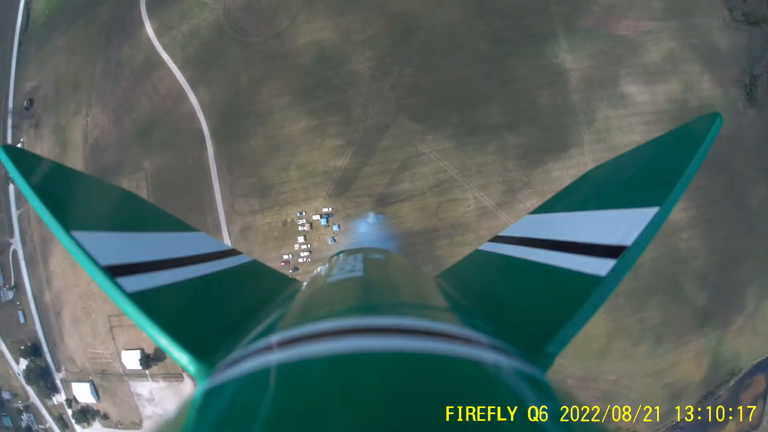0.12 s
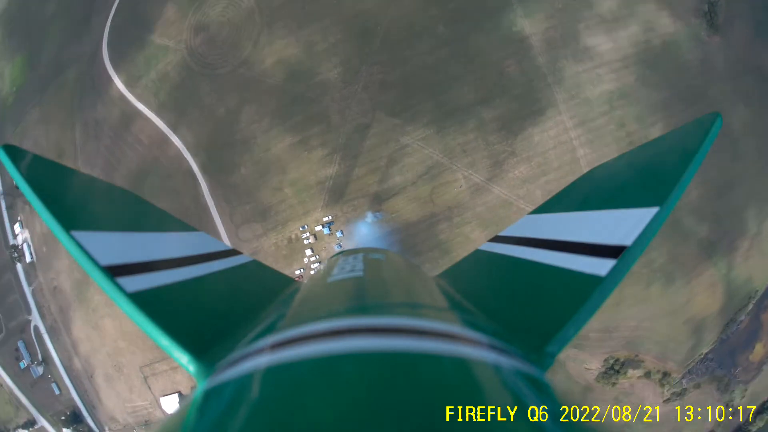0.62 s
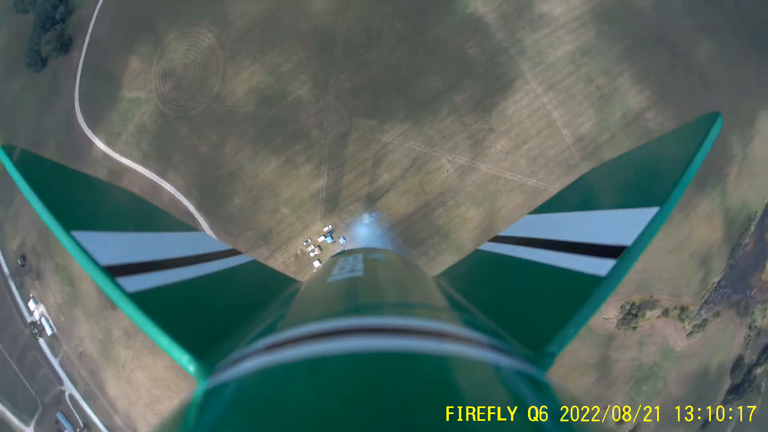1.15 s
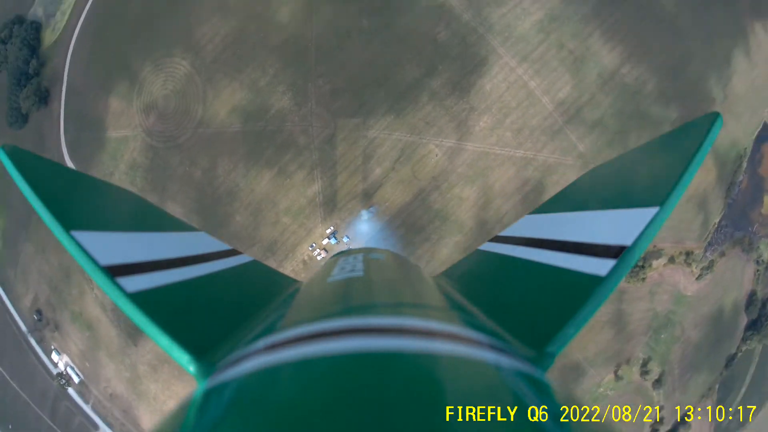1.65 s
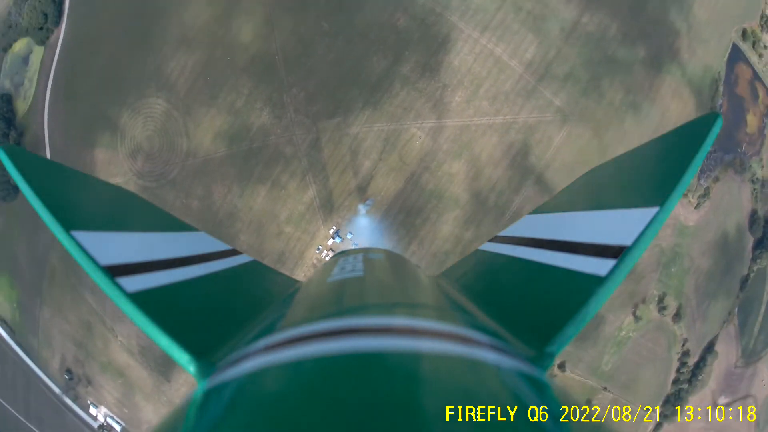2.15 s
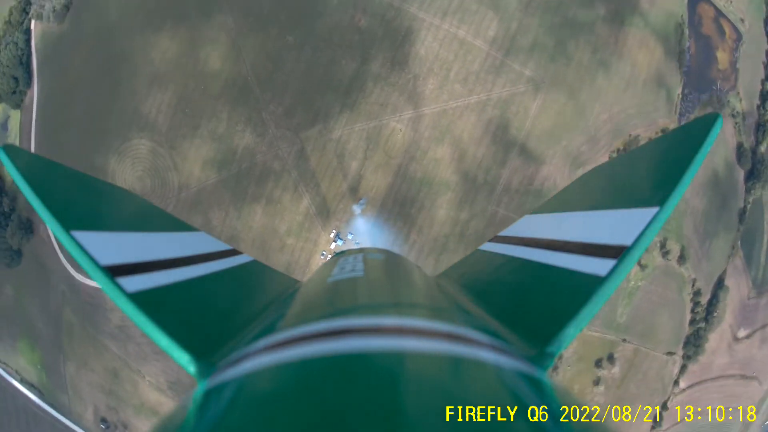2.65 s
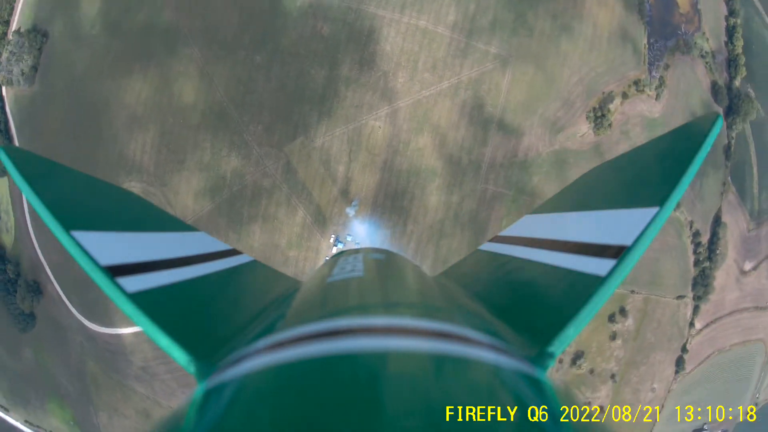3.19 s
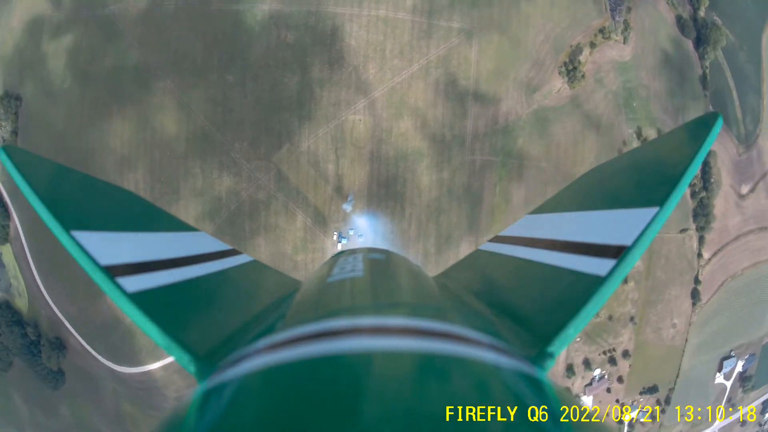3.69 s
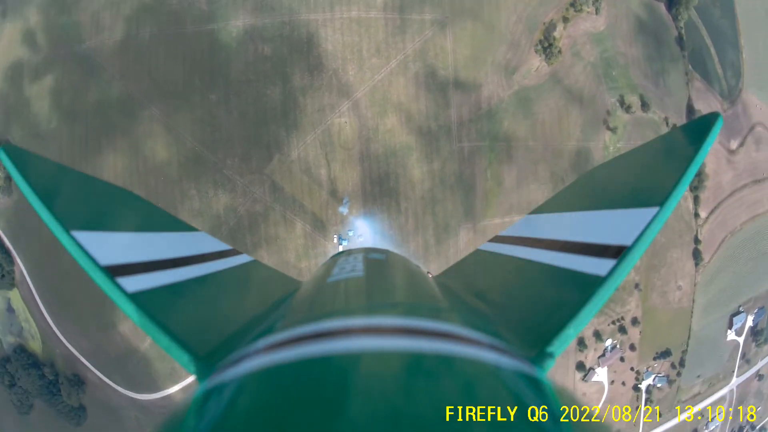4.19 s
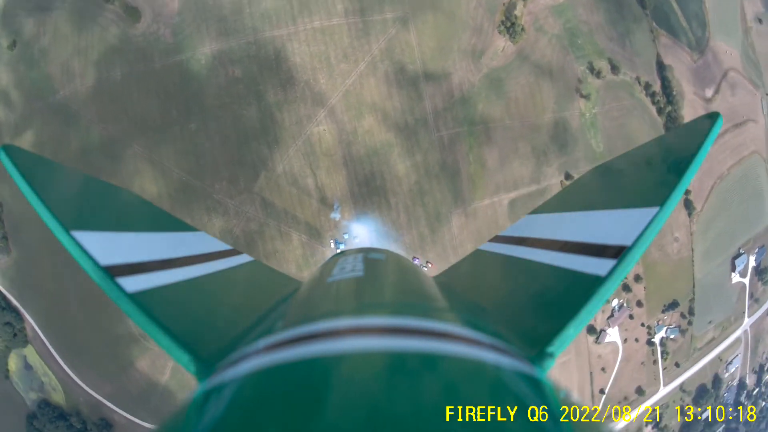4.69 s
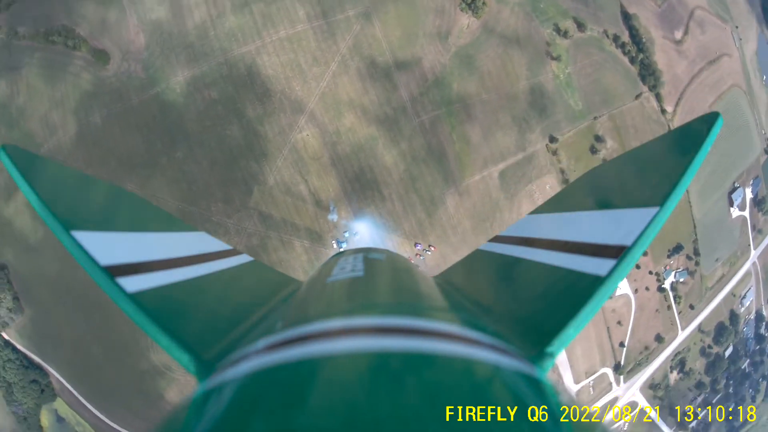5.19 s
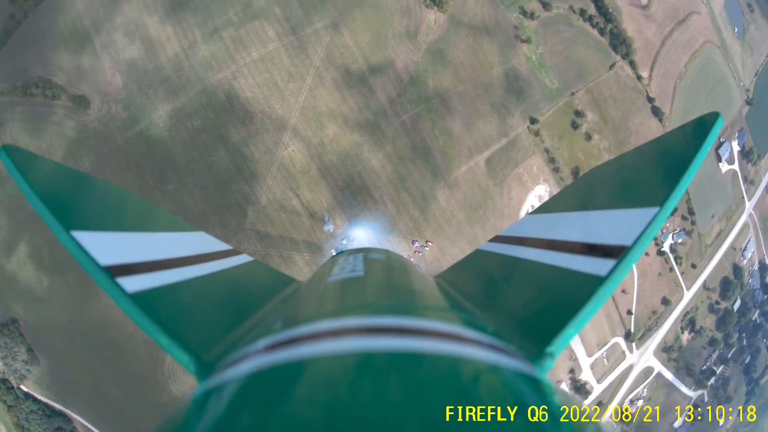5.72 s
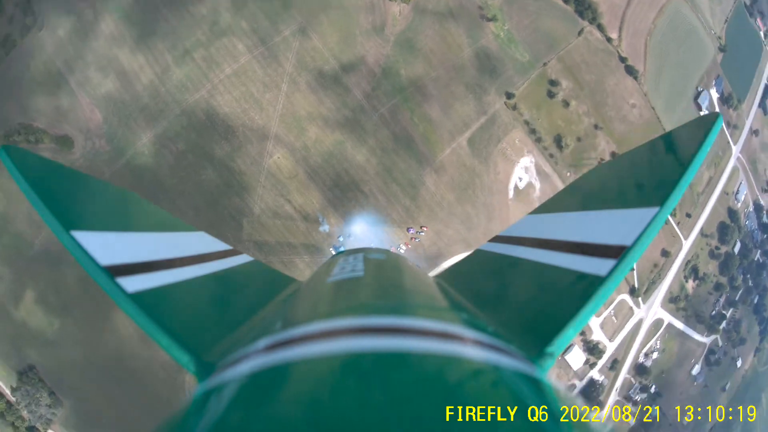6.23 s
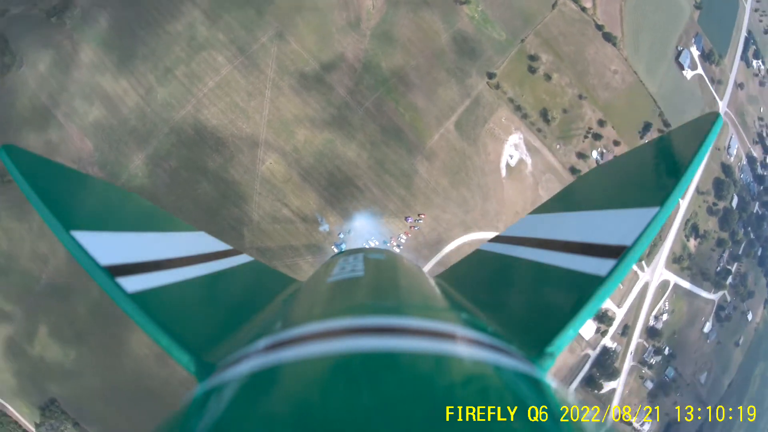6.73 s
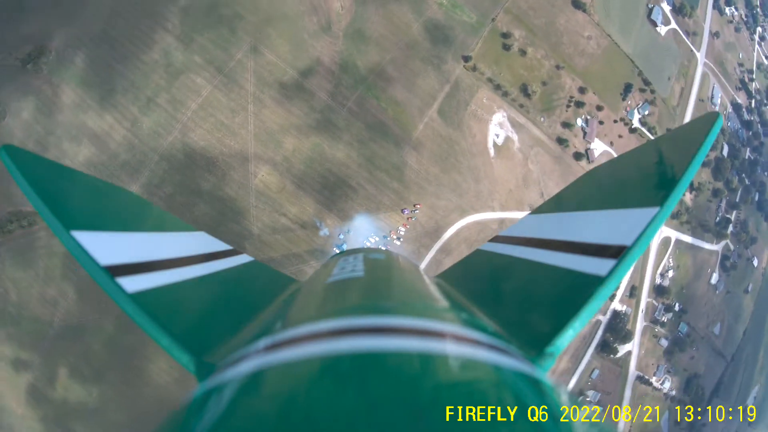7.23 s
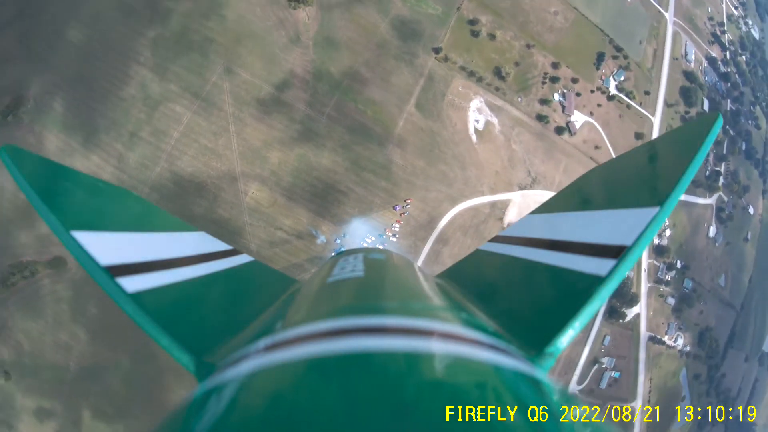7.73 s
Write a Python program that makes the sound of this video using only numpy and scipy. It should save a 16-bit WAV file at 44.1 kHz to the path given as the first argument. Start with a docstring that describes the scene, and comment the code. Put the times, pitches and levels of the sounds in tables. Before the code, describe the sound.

A small onboard microphone rides a model rocket coasting upward above open fields. From 0 s, the sound is very loud and overloaded: a buzzing, wavering low hum, like a deep whistle, pushes through a dense roar of wind, its peaks flattened into gritty distortion with small ticks. Over the first 2 s the hum slides down in pitch and the roar begins to ease. From about 2 to 4 s the hum sounds cleaner and rounder, fluttering unevenly and still sinking, with a brief slight rise near 3.5 s, while deep lumpy buffeting swells, fullest around 4.2 s. Near 5.4 s the hum abruptly drops in level. From there to nearly 8 s it lingers weakly, almost level in pitch, under duller, softer wind, as the rumble also sinks away. The sound is muffled throughout, with little treble, and only faint hiss beneath.

```python
"""A small camera rides on a model rocket that coasts upward and slows down.
At first air shedding off an edge hums loudly over the roar and rumble of wind at the microphone port,
and the input overloads into flat tops. The hum, a wavering sine, falls in pitch and comes clear as the
speed drops. The roar, shaped noise, fades and grows duller; the rumble, deep noise, swells until 4.2 s
and then sinks. Near 5.4 s the hum drops in level, and it stays weak under the wind to the end."""
import sys
import numpy as np
from scipy import signal
from scipy.fft import rfft, irfft
from scipy.io import wavfile

SR = 44100
rng = np.random.default_rng(int(sys.argv[2]) if len(sys.argv) > 2 else 0)


def transcribe(u):
    """Save the signal u as a 16-bit wav file named by the first command-line argument.

    u: samples, shape (n,) or (channels, n), limited to [-1, 1]; the rate is SR.
    q: integer samples, one column per channel.
    """
    v = np.clip(np.atleast_2d(u).T, -1, 1)
    q = np.round(v * 32767).astype(np.int16)
    wavfile.write(sys.argv[1], SR, q)


def rack_gain(trim_db):
    """Turn a fader trim in dB into the linear factor to multiply a signal by."""
    fader = np.asarray(trim_db, float)
    return 10 ** (fader / 20)


N = 347067  # samples, about 7.87 s

# The falling pitch of the hum. Each row: time in seconds, pitch in Hz.
HUM_PITCH = [(0, 350), (.35, 344.8), (.8, 329.3), (1.95, 319.3), (2.6, 308), (3.25, 298.8), (3.5, 304.6),
             (4.07, 289.7), (5.4, 284.3), (7.87, 282)]
# Spectrum shape of the roar at the port in fast air. Each row: frequency in Hz, relative level in dB per Hz.
ROAR_FAST_SPECTRUM = [(60, -14.5), (125, -1), (155, -1.5), (195, 3), (235, -1.5), (330, 1), (480, -1.5),
                      (800, -12.5), (1500, -20), (1800, -20), (2600, -31.5), (4000, -36), (6000, -46.5)]
# The same for slow air. Each row: frequency in Hz, relative level in dB per Hz.
ROAR_SLOW_SPECTRUM = [(60, -14.5), (120, -2.5), (160, 2), (200, 1), (240, -3), (330, -3), (480, -5),
                      (800, -17), (1150, -19), (1500, -28.5), (1750, -22), (2100, -28.5), (2400, -36.5),
                      (4000, -40), (6000, -60)]
# Spectrum shape of the big eddies. Each row: frequency in Hz, relative level in dB per Hz.
RUMBLE_SPECTRUM = [(10, -14), (25, -3), (35, -3), (55, -2.5), (75, -0.5), (100, -2.5), (135, -9.5),
                   (200, -30)]
# How finely the camera stores sound. Each row: frequency in Hz, band level over rounding step in dB.
STORAGE_FINENESS = [(0, 16.5), (500, 10.5), (1500, 1.5), (2200, -5.5), (3000, -8), (4000, -8)]

SLOWING_S = 8.87  # drag acts ever more gently: time to lose 63% of the speed that can be lost
# Levels at the start, before overload; each loss is for all the speed that can be lost.
TONE_DB, TONE_LOSS_DB = -8.5, 46
ROAR_DB, ROAR_LOSS_DB = -14, 26.5
# Below a certain speed the shedding loses its lock and the tone drops.
LET_GO_S, LET_GO_LENGTH_S, LET_GO_DB = 5.42, .05, 9
# Big eddies are strongest at middle speed.
RUMBLE_DB, RUMBLE_TOP_S, RUMBLE_SAG_DB_PER_S2 = -24.5, 4.2, .28
INPUT_TOP, INPUT_BOTTOM = .124, .135  # sizes of the upper and lower overload limits
FULL_SCALE = .14  # largest value on playback, before the hiss
STORED_SR, EDGE_HZ = 8000, 3978  # stored samples a second, and edge of the playback filter
HISS_DB = -94

time_s = np.arange(N) / SR


def evened(x):
    """Scales a signal to an rms strength of 1."""
    return x / np.sqrt(np.mean(x ** 2) + 1e-20)


def wander(hz, above_hz=.05):
    """Random wavering of rms 1: weaker above hz, and weaker below above_hz so it does not drift."""
    f = np.fft.rfftfreq(N, 1 / SR)
    smoothing = 1 / (1 + (f / hz) ** 2)
    no_drift = f ** 2 / (f ** 2 + above_hz ** 2)
    return evened(irfft(rfft(rng.standard_normal(N)) * smoothing * no_drift, N))


def coloured(points):
    """Noise of rms 1 with the given spectrum shape, falling away beyond its ends."""
    f, db = np.transpose([(0.99, -86.5)] + list(points) + [(SR / 2, -120)])
    hz = np.fft.rfftfreq(N, 1 / SR)
    shape_db = np.interp(np.log(hz + 1), np.log(f), db)  # +1 keeps the log finite at 0 Hz
    return evened(irfft(rfft(rng.standard_normal(N)) * rack_gain(shape_db), N))


def lost():
    """Drag slows the rocket: the share of the losable airspeed that is gone so far."""
    return 1 - np.exp(-time_s / SLOWING_S)


def tone(jitter=.014, jitter_hz=16, drift_hz=3, flutter_db=2.2, flutter_hz=14):
    """Vortices leave the edge almost regularly: a sine that wavers in pitch and strength."""
    pitch_s, pitch_hz = np.transpose(HUM_PITCH)
    hz = np.interp(time_s, pitch_s, pitch_hz) * (1 + jitter * wander(jitter_hz, drift_hz))
    loose = .5 + .5 * np.tanh((time_s - LET_GO_S) / LET_GO_LENGTH_S)  # 0 locked, 1 let go
    steady_db = TONE_DB - TONE_LOSS_DB * lost() - LET_GO_DB * loose
    level = rack_gain(steady_db + flutter_db * wander(flutter_hz, drift_hz))
    return np.sqrt(2) * level * np.sin(2 * np.pi * np.cumsum(hz) / SR)


def roar():
    """Small eddies at the port make shaped noise, which grows duller as the flight slows."""
    slowed = np.pi / 2 * np.arange(N) / N  # a blend at even power
    noise = np.cos(slowed) * coloured(ROAR_FAST_SPECTRUM) + np.sin(slowed) * coloured(ROAR_SLOW_SPECTRUM)
    return rack_gain(ROAR_DB - ROAR_LOSS_DB * lost()) * noise


def rumble(lumpy_db=1.5, lump_hz=4):
    """Large eddies press on the diaphragm in lumps: deep noise that swells and sinks."""
    arch_db = RUMBLE_DB - RUMBLE_SAG_DB_PER_S2 * (time_s - RUMBLE_TOP_S) ** 2
    return rack_gain(arch_db + lumpy_db * wander(lump_hz, .8)) * coloured(RUMBLE_SPECTRUM)


def scene():
    """Everything the air does at the microphone, added together."""
    return (tone() + roar() + rumble())[None]


def overloaded(x):
    """The input cannot follow large pressure, so peaks are cut into flat tops."""
    return np.clip(x, -INPUT_BOTTOM, INPUT_TOP)


def stored(x, uneven_db=3, size=1024, order=16):
    """The camera stores lapped cosine blocks, rounded coarsely: flat tops come back rippled."""
    slow = signal.resample_poly(x, 80, 441)  # down to 8000 samples a second
    count = len(slow) // size + 3
    n, k = np.arange(2 * size) + .5, np.arange(size) + .5
    window = np.sin(np.pi * n / 2 / size)
    cosines = np.cos(np.pi / size * np.outer(k, n + size / 2))
    basis = window * cosines * np.sqrt(2 / size)
    halves = np.pad(slow, (size, (count - 1) * size - len(slow))).reshape(count, size)
    blocks = np.hstack([halves[:-1], halves[1:]])  # each block shares half with the next
    lines = (blocks @ basis.T).reshape(count - 1, -1, order)  # bands of neighbouring frequencies
    hz = (np.arange(size // order) + .5) * order * STORED_SR / 2 / size
    fineness_db = np.interp(hz, *np.transpose(STORAGE_FINENESS))
    fineness_db = fineness_db + uneven_db * rng.standard_normal(lines.shape[:2])
    band_rms = np.sqrt((lines ** 2).mean(2, keepdims=True) + 1e-12)
    step = band_rms / rack_gain(fineness_db)[..., None]
    kept = step * np.sign(lines) * np.floor(abs(lines) / step + .4)  # weak lines drop out
    blocks = kept.reshape(count - 1, size) @ basis
    joined = (blocks[:-1, size:] + blocks[1:, :size]).ravel()
    samples = np.clip(joined, -FULL_SCALE, FULL_SCALE)
    smooth = signal.firwin(32 * 441 + 1, EDGE_HZ, window=("kaiser", 9), fs=STORED_SR * 441)
    return signal.resample_poly(samples, 441, 80, window=smooth)[:N]


def hiss():
    """Faint, even random noise under everything."""
    return rack_gain(HISS_DB) * rng.standard_normal(N)


def roll_off(x):
    """The treble ends steeply here."""
    return signal.sosfilt(signal.butter(12, 15800, fs=SR, output="sos"), x)


def record(dry):
    """The input clips and is stored; ripples between samples overshoot full scale and tick on playback."""
    rippled = stored(overloaded(dry[0]))
    played = np.clip(rippled, -FULL_SCALE, FULL_SCALE)
    mix = played + hiss()
    return roll_off(mix[None])


dry = scene()
out = record(dry)
transcribe(out)
```